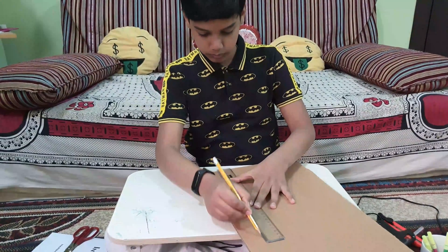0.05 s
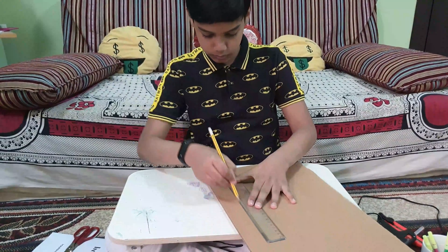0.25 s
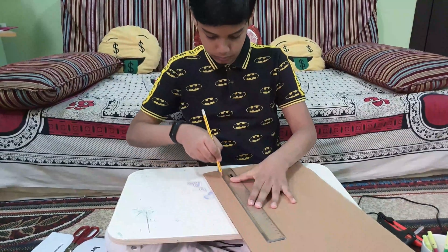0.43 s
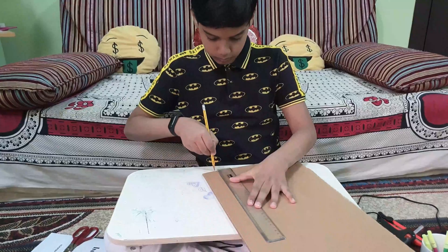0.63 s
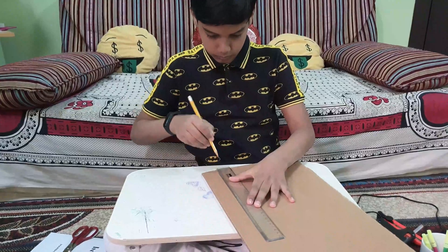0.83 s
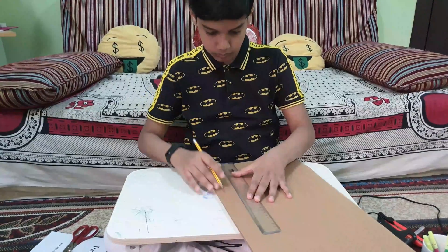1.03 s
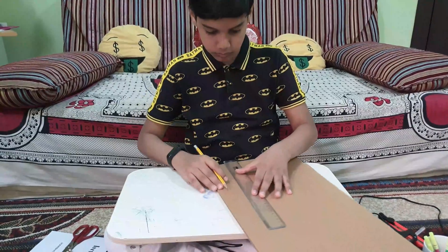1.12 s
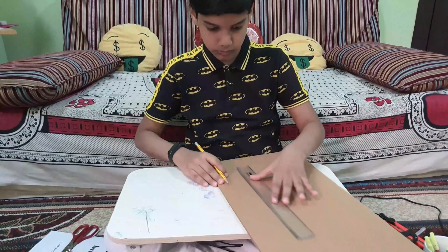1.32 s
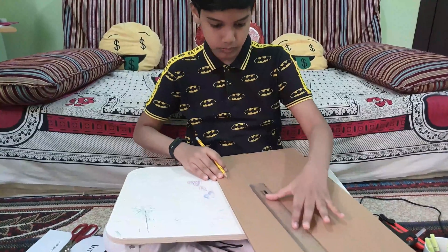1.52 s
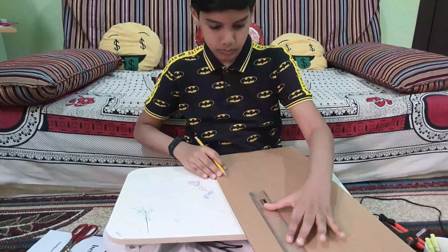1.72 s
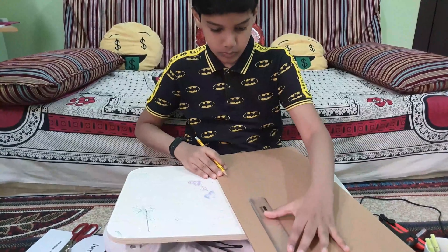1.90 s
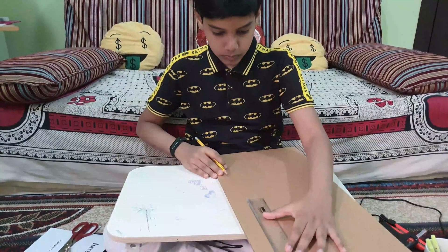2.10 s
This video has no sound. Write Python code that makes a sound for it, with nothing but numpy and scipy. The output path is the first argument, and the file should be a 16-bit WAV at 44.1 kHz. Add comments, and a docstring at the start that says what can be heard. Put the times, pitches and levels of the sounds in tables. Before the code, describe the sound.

Pencil scratching on cardboard, one sharp knock, then cardboard and ruler scrape across a table.

```python
"""A pencil scratches along a ruler over cardboard, its lead slipping on paper fibres and chattering
near the end of the line. One sharp knock rings the ruler and the small table; then cardboard and
ruler scrape across the top, catching on grit. The table bumps softly under the hands.
Heard from a stereo pair of microphones near the table, in a quiet, small room."""
import sys
import numpy as np
from scipy import signal
from scipy.fft import rfft, irfft
from scipy.io import wavfile

SR = 44100
rng = np.random.default_rng(int(sys.argv[2]) if len(sys.argv) > 2 else 0)


def inscribe(sig):
    """Save sig as 16-bit PCM at rate SR to the path in sys.argv[1].

    A 1-D sig is mono; a 2-D sig holds one channel per row.
    Samples are clipped to [-1, 1] before scaling.
    """
    pcm = np.round(np.clip(np.atleast_2d(sig).T, -1, 1) * 32767)
    wavfile.write(sys.argv[1], SR, pcm.astype(np.int16))


N = 94815
TIME, FREQS = np.arange(N) / SR, np.fft.rfftfreq(N, 1 / SR)

def amp(db):
    """Decibels to gain."""
    return 10 ** (np.asarray(db) / 20)

def unit(x):
    """Scales to rms 1."""
    return x / np.sqrt(np.mean(x ** 2) + 1e-20)

def curve_at(points, hz=FREQS):
    """Reads a curve on a log-frequency axis."""
    f, value = np.transpose(points)
    return np.interp(np.log(hz + 1), np.log(f + 1), value)

def level(rows, column=1):
    """Gain over time from one dB column, fading 430 dB a second beyond its ends."""
    rows = np.array(rows)
    outside_s = np.maximum(rows[0, 0] - TIME, 0) + np.maximum(TIME - rows[-1, 0], 0)
    return amp(np.interp(TIME, rows[:, 0], rows[:, column]) - 430 * outside_s)

def colour(x, points):
    """Filters a sound by a dB curve, then scales it to rms 1."""
    return unit(irfft(rfft(x) * amp(curve_at(points)), N))

def delayed(x, seconds):
    """The same sound, later."""
    return np.array([np.interp(TIME - seconds, TIME, side, left=0) for side in x])

# Between the microphones. Each row: frequency in Hz, likeness from 0 to 1.
LIKENESS_BASS = [(50,.84),(200,.94)]
LIKENESS_TREBLE = [(450,0.87),(850,0.7),(1200,0.43),(1700,0.57),(2200,0.48),(2800,0.086),(4500,0.38),(7000,0.17),(12000,.05)]
# Each row: frequency in Hz, left over right in dB.
BALANCE = [(50,-2.5),(300,-.5),(1000,0.8),(1750,-4),(2500,-4),(3000,-2),(3800,2.5),(4800,-1),(6800,2),(7900,8.5),(9000,2),(10500,-2),(15000,0.5)]
def microphones(x):
    """Two unrelated signals reach the pair alike in the bass, apart in the treble."""
    a, b = rfft(x)
    likeness = curve_at(LIKENESS_BASS + LIKENESS_TREBLE)
    lean = amp(curve_at(BALANCE) / 2)
    mid, side = a * np.sqrt((1 + likeness) / 2), b * np.sqrt((1 - likeness) / 2)
    return irfft(np.array([(mid + side) * lean, (mid - side) / lean]), N)

def noise():
    """Stereo noise at the microphones."""
    return microphones(rng.standard_normal((2, N)))

# The quiet room. Each row: frequency in Hz, relative level in dB.
RUMBLE_COLOUR = [(15,-17),(35,-11),(58,2.5),(80,-1),(120,-1),(160,-18.5),(300,-18.5),(1000,-52)]
HISS_COLOUR = [(50,-2.5),(300,-6.5),(1000,-13.5),(3000,-19.5),(8000,-28),(16000,-29)]
# Each row: time in seconds, rumble level in dB.
RUMBLE_LEVEL = [(0,-69),(.35,-53.5),(.8,-61.5),(1.3,-58.5),(1.8,-59.5),(1.95,-65),(2.15,-68)]
def room_tone():
    """A low rumble rises and falls under steady hiss."""
    return colour(noise(), RUMBLE_COLOUR) * level(RUMBLE_LEVEL) + amp(-69) * colour(noise(), HISS_COLOUR)

# The room around the table. Each row: frequency in Hz, seconds to fall 60 dB.
ROOM_T60 = [(100,0.71),(400,0.38),(2000,0.34),(5000,0.49),(16000,0.24)]
def room_tail():
    """Diffuse reflections, each band dying at its own speed."""
    hz, t, bands = signal.stft(noise(), SR, nperseg=256)
    decay = amp(-60 * t / curve_at(ROOM_T60, hz)[:, None])
    return signal.istft(bands * decay, SR, nperseg=256)[1][:, :N]

def swell(peak_s, half_s, hz, width_hz, db):
    """A resonance driven by noise into a short, unsteady ring."""
    envelope = np.exp(-((TIME - peak_s) / half_s) ** 2 / 2)
    resonance = 1 / (1 + ((FREQS - hz) / width_hz * 1.68) ** 2) ** 1.2
    ring = irfft(rfft(noise()) * resonance, N) * envelope
    return amp(db) * unit(ring) * np.sqrt(np.mean(envelope ** 2))

# Each row: peak time and half length in seconds, pitch and width in Hz, level in dB.
TABLE_BUMPS = [(.01,0.023,99,39.8,-52),(.01,0.019,402,93,-49),(0.732,0.012,65,40,-55),(0.895,0.035,82,22,-54),(0.979,0.03,97.5,29.8,-55),(1.21,0.016,206,170,-49),(1.69,0.053,62.5,25,-57),(2.124,0.024,64.4,40.2,-52)]
def table_bumps():
    """The table thuds softly under the hands."""
    return sum(swell(*row) for row in TABLE_BUMPS)

# Each row: peak time and half length in seconds, pitch and width in Hz, level into the table in dB.
BOARD_HUMS = [(0.278,0.039,238,20,-45.5),(0.17,0.061,266,110,-45),(0.25,0.094,192,30,-55),(0.426,0.017,360,36,-41.5),(0.44,0.15,347,113,-52),(0.504,0.085,242,104,-53),(0.24,0.13,878,115,-49.5),(0.12,0.047,590,320,-49),
              (1.097,0.033,268,81,-56),(1.122,0.089,590,410,-60),(1.323,0.11,364,154,-55),(1.47,0.036,670,140,-46),(1.545,0.017,430,110,-43.5),(1.619,0.047,346,210,-51),(1.72,0.032,294,81,-55)]
# The table top. Each row: resonance and half width in Hz, gain in dB.
TABLE_MODES = [(181.5,12.7,1.5),(245,7.2,2),(295.7,7.4,2.5),(352.2,16,3),(396,14.6,-1),(476,18.3,0),(555,22,2),(857,31,2.5),(965,25,0.5),(1070,27,5.5)]
def board_hum(between_modes_db=-12):
    """The rubbed cardboard hums through the table top, which favours its own resonances."""
    hum = sum(swell(*row) for row in BOARD_HUMS)
    peaks = sum(amp(db) / (1 + ((FREQS - hz) / width) ** 2) for hz, width, db in TABLE_MODES)
    return irfft(rfft(hum) * (amp(between_modes_db) + peaks), N)

# Each row: peak time and half length in seconds, pitch in Hz, level in dB.
EDGE_CHATTER = [(0.246,0.025,2330,-42.5),(0.329,0.0033,4450,-39),(0.393,0.0041,1700,-33.5),(0.404,0.0044,1690,-35.5),(0.435,0.014,2290,-36.5),(0.437,0.0044,4120,-37.5),(0.495,0.013,2080,-36),(0.544,0.016,2160,-34.5),(0.604,0.0083,4580,-45.5),(1.247,0.0035,2330,-37),(1.269,0.0033,2430,-40),(1.283,0.005,3050,-40.5),(1.463,0.0061,2150,-41.5),(1.476,0.064,4550,-48.5),(1.755,0.0062,2490,-48)]
def chatter(width_hz=240):
    """A catching edge rings in short bursts."""
    return sum(swell(at, half, hz, width_hz, db) for at, half, hz, db in EDGE_CHATTER)

# Grit under pencil or board. Each row: start in seconds, level in dB.
GRIT_SNAPS = [(0.246,-38),(.33,-35),(1.245,-35.5),(1.2858,-38),(1.29,-31),(1.3134,-32.5),(1.3555,-30),(1.358,-32),(1.3806,-28),(1.3906,-27),(1.431,-31.5),(1.4585,-38),(1.476,-31),(1.534,-30.5),(1.549,-37),(1.603,-35),(1.719,-48)]
# Each row: frequency in Hz, relative level in dB.
GRIT_COLOUR = [(80,-45),(1100,-16),(2100,3),(3000,-6),(4300,2.5),(6000,-4.5),(8000,-17),(16000,-25)]
def grit(rise_s=0.00085):
    """Short scratchy snaps as grit catches and lets go."""
    envelope = np.zeros(N)
    for start, db in GRIT_SNAPS:
        age = np.maximum(TIME - start, 0) / rise_s
        envelope += amp(db) * age * np.exp(1 - age)
    return colour(noise(), GRIT_COLOUR) * envelope

def friction(slips_per_s, spread_db, clump_db, clump_hz, smooth):
    """Tiny slips of uneven size, in clumps, over a smooth rub."""
    slips = (rng.random(N) < slips_per_s / SR) * amp(spread_db * np.minimum(rng.exponential(1, N), 4))
    drive = unit(slips * rng.choice([-1., 1.], (2, N))) + smooth * rng.standard_normal((2, N))
    clumps = unit(irfft(rfft(rng.standard_normal(N)) * np.exp(-(FREQS / clump_hz) ** 2), N))
    return microphones(drive * amp(clump_db * clumps))

# Across the table top. Each row: time in seconds, scrape level in dB, fizz level in dB before its trim.
SLIDE_LEVELS = [(0.92,-77,-79),(0.986,-61.5,-71.5),(1.078,-50,-65),(1.15,-47,-61.5),(1.235,-48,-59),(1.28,-37.5,-53),(1.335,-38.5,-50.5),(1.46,-36.5,-43.5),(1.53,-39.5,-45),(1.65,-44,-54),(1.72,-49,-61.5),(1.78,-46,-57),(1.986,-57.5,-70),(2.046,-83,-93)]
# Scrape and fizz. Each row: frequency in Hz, relative level in dB.
SLIDE_COLOUR = [(260,-19.5),(450,-7.5),(600,-10.5),(850,-5),(1030,-12),(1650,1),(2030,-2),(2450,2),(3000,-0.5),(3900,2),(4600,-1),(5600,-6),(6600,-10),(8000,-27),(11000,-23),(16000,-75)]
SLIDE_FIZZ = [(3000,-59),(5500,-3),(6500,-4.5),(8000,-7.5),(11000,-7.5),(16000,-12)]
def slide(fizz_trim_db=1):
    """Cardboard and ruler scrape across the table, brighter as they speed up."""
    coarse = friction(slips_per_s=2800, spread_db=2.5, clump_db=1.2, clump_hz=130, smooth=0.93)
    fine = friction(slips_per_s=6000, spread_db=0, clump_db=1.2, clump_hz=150, smooth=1.3)
    scrape = colour(coarse, SLIDE_COLOUR) * level(SLIDE_LEVELS)
    fizz = colour(fine + 0.38 * coarse, SLIDE_FIZZ) * level(SLIDE_LEVELS, column=2)
    return scrape + amp(fizz_trim_db) * fizz

# Ruler and table. Each row: pitch in Hz, relative level in dB, seconds to fall 60 dB,
# left over right in dB, lag at the right microphone in ms.
KNOCK_MODES = [(312,-23,0.19,2,-0.086),(355.3,-19,0.23,-1.5,0.1),(840,-14.5,0.05,-0.5,0.019),(1020,-15.5,0.079,-6,-0.23),(1170,-19,0.1,-4,-0.046),(1606,-9,0.12,5,0.19),(1975,-15,0.091,4,0.098),(2160,4,0.011,-2,0.197),(2700,-1,0.015,-2,-0.088),(3820,-15,0.02,1,-0.062),(4900,-8.5,.012,-2,0.117)]
# Off nearby surfaces. Each row: delay in seconds, gain in dB.
NEAR_ECHOES = [(.0014,-8),(.006,-17.5),(.021,-22.5),(0.0314,-22),(.052,-19)]
# The knock out in the room. Each row: frequency in Hz, relative level in dB.
TAIL_COLOUR = [(150,-18),(250,-18),(340,-3.5),(420,-11.5),(560,-3.5),(670,-23),(800,-5),(900,-8.5),(1120,2),(1380,-11),(1610,-2),(1780,-7),(2060,2),(2380,-8),(2650,-5.5),(3500,-14.5),(5000,-24.5),(8000,-36.5),(16000,-46.5)]
def knock(start_s=0.6455, settle_s=0.722, contact_s=0.00045, tick_s=0.00085, build_s=0.0096):
    """A hard tap on ruler and table: a tick, short modes, a faint second contact, the room's answer."""
    t, modes = np.maximum(TIME - start_s, 0), np.zeros((2, N))
    for hz, db, t60, lean_db, lag_ms in KNOCK_MODES:
        age = np.maximum(t - np.array([[0], [lag_ms / 1000]]), 0) * (t > 0)
        attack = 1 - np.exp(-(age / contact_s) ** 2)
        sides_db = np.array([[lean_db], [-lean_db]]) / 2
        modes += amp(db + sides_db - 60 * age / t60) * attack * np.sin(2 * np.pi * hz * age)
    tick = colour(noise(), [(100, -32), (500, -12), (2400, 8), (6000, -9), (16000, -28)])
    tick *= t / tick_s * np.exp(1 - t / tick_s)
    direct = amp(-14) * modes + amp(-23) * tick
    echoes = sum(amp(db) * delayed(direct, delay) for delay, db in NEAR_ECHOES)
    second_contact = amp(-16.5) * delayed(direct, settle_s - start_s)
    tail = colour(np.roll(room_tail(), round(start_s * SR), 1), TAIL_COLOUR)
    tail *= 1 - np.exp(-t / build_s)
    tail /= np.sqrt(np.mean(tail[:, (t > 0) & (t < 0.04)] ** 2))  # rms 1 over its first 40 ms
    return direct + echoes + second_contact + amp(-34) * tail

# Along the ruler. Each row: time in seconds, scratch level in dB, fizz level in dB before its trim.
PENCIL_LEVELS = [(0.01,-68,-94),(0.044,-64,-76.5),(0.11,-44,-66),(0.17,-41,-56.5),(0.25,-39,-50.5),(0.356,-40,-50),(0.432,-36.5,-49.5),(0.464,-39,-53),(0.55,-39,-53),(0.605,-38.5,-58.5),(0.628,-48,-61)]
# Three stages of scratch, and the lead's fizz. Each row: frequency in Hz, relative level in dB.
PENCIL_DULL = [(260,-33),(450,-6),(720,-9),(862,0),(1150,-10),(1750,-3.5),(2450,-6.5),(3050,-20.5),(3600,-9),(4200,-17.5),(5400,-21.5),(8000,-34),(10400,-42),(17600,-120)]
PENCIL_EARLY = [(260, -53), (450, -5.5), (490, -11), (646, -20), (832, -2.5), (961, -6.5), (1330, -7.5),
                (1560, -7.5), (2340, 0.5), (2710, -6), (4490, -5.5), (8000, -24.5), (10400, -46),
                (17600, -120)]
PENCIL_LATE = [(260, -43.5), (450, -10.5), (662, -20), (832, -2), (961, -7), (1030, -6), (1650, -5),
               (2130, -5), (2610, -8), (3530, -8.5), (3930, -2), (5000, -14), (8000, -43), (10400, -43),
               (17600, -120)]
PENCIL_FIZZ = [(3000,-47),(5000,-8),(6100,1.5),(7300,-4),(11000,-6),(16000,-11.5)]
def pencil(fizz_trim_db=1):
    """Lead scratches over paper fibres: dull as it gathers speed, then changing colour up the board."""
    drive = friction(slips_per_s=3800, spread_db=2.5, clump_db=1.5, clump_hz=130, smooth=0.75)
    dull = np.interp(TIME, (0.17, 0.245), (1, 0))
    late = np.interp(TIME, (0.33, 0.42), (0, 1))
    scratch = (dull * colour(drive, PENCIL_DULL)
               + (1 - dull - late) * colour(drive, PENCIL_EARLY)
               + late * colour(drive, PENCIL_LATE))
    fizz = colour(drive, PENCIL_FIZZ) * level(PENCIL_LEVELS, column=2)
    return scratch * level(PENCIL_LEVELS) + amp(fizz_trim_db) * fizz

def scene(room_db=-9):
    """The rubbing and its reflections, with the rings, bumps and knock, over the room tone."""
    rub = pencil() + slide() + grit()
    tail = room_tail()
    reflections = signal.fftconvolve(rub.mean(0)[None], tail / np.linalg.norm(tail[0]), axes=1)[:, :N]
    return rub + amp(room_db) * reflections + chatter() + board_hum() + table_bumps() + knock() + room_tone()

def record(dry, cutoff_hz=15900):
    """The recorder's band limit."""
    lowpass = signal.firwin(511, cutoff_hz, window=("kaiser", 9), fs=SR)
    return signal.oaconvolve(dry, lowpass[None], "same")

dry = scene()
out = record(dry)
inscribe(out)
```